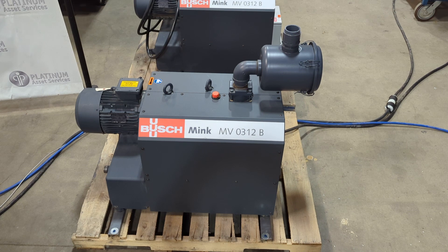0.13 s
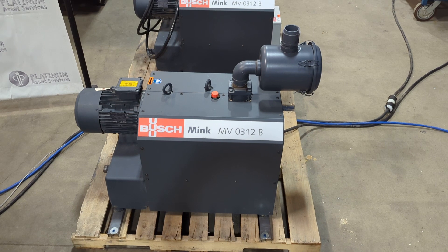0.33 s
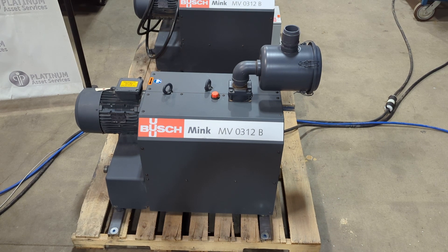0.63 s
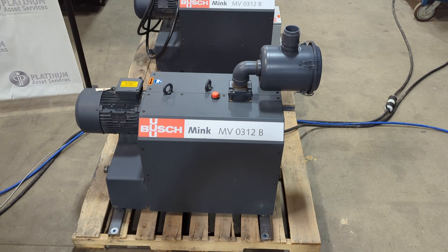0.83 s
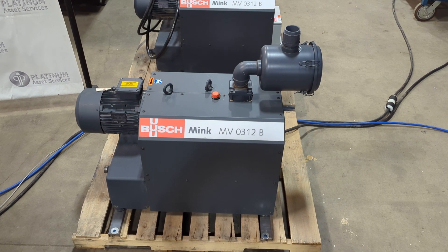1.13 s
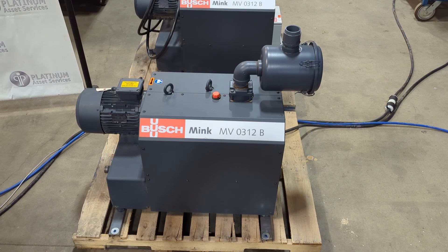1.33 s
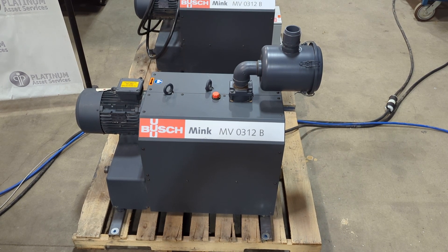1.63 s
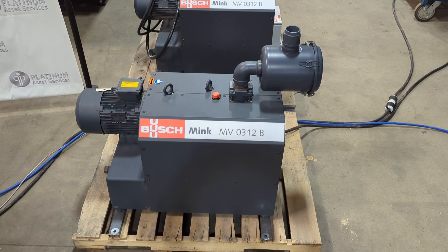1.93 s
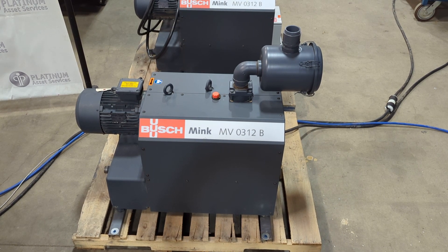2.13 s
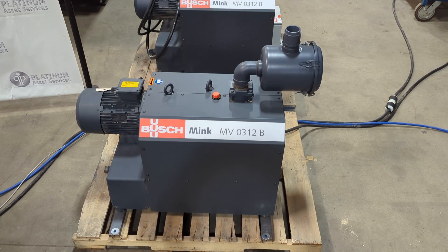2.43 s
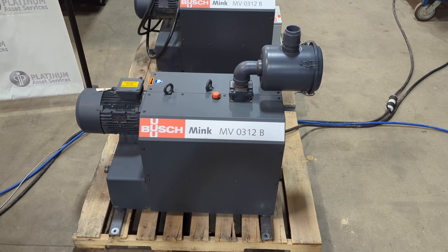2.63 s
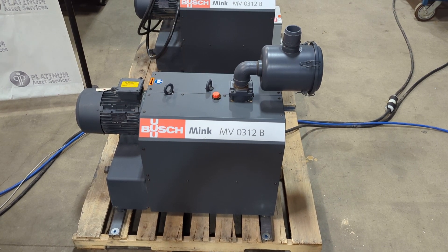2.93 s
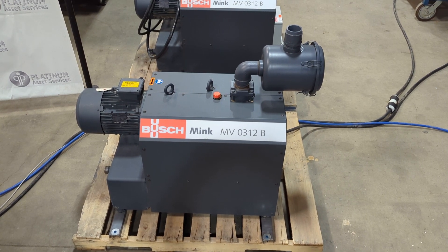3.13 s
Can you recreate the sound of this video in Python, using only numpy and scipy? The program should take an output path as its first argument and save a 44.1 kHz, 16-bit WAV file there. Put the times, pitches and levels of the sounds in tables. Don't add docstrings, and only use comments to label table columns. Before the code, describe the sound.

A vacuum pump hums continuously in a concrete hall, its low buzzing drone layered with higher whirring tones and rushing air, captured close by a stereo phone that ducks the level early on.

```python
import sys
import numpy as np
from scipy import signal
from scipy.fft import rfft, irfft, next_fast_len
from scipy.io import wavfile
from scipy.ndimage import uniform_filter1d

SR = 44100
rng = np.random.default_rng(int(sys.argv[2]) if len(sys.argv) > 2 else 0)


def wrap_up_sound(samples):
    columns = np.atleast_2d(samples).T
    tamed = np.clip(columns, -1, 1)
    steps = np.round(tamed * 32767).astype(np.int16)
    wavfile.write(sys.argv[1], SR, steps)


def level_to_linear(level):
    exponent = np.asarray(level, float) / 20
    return 10 ** exponent


N = 145089
BASS_HZ = 400


def on_log(points, hz):
    p = np.array(points)
    return np.interp(np.log(hz + 1), np.log(p[:, 0]), p[:, 1])


def peak(hz, at_hz, width_hz):
    return 1 / (1 + (2 * (hz - at_hz) / width_hz) ** 2)


def walk(rate_hz):
    hold = int(SR / rate_hz)
    steps = np.repeat(rng.standard_normal(400), hold)[:N]
    drift = uniform_filter1d(uniform_filter1d(steps, hold), hold)
    return (drift - drift.mean()) / drift.std()


def surrounding_likeness(hz):
    port_likeness, ports_m, sound_m_per_s = 1, .145, 343
    return port_likeness * np.sinc(2 * hz * ports_m / sound_m_per_s)


def hall_ripple(hz):
    t60_s, ripple_db = .35, 2
    size = 2 * (len(hz) - 1) if SR / 2 - hz[-1] < 1e-6 else 2 * len(hz) - 1
    echoes = rng.standard_normal((2, size)) * level_to_linear(-60 * np.arange(size) / SR / t60_s)
    one, other = rfft(echoes).real / np.sqrt(np.sum(echoes ** 2) / 4)
    around = surrounding_likeness(hz)
    right = around * one + np.sqrt(1 - around ** 2) * other
    return ripple_db * np.clip(hz / BASS_HZ / 2, 0, 1) * np.array([one, right])


def air_colour(hz):
    # f/Hz, level/dB per Hz
    rush = [(30.0, -41), (55.0, -1), (250.0, -3.5), (550.0, -4.5), (900.0, 0.0), (2300.0, 0),
            (4000.0, -10.5), (15500.0, -19)]
    # f/Hz, difference/dB
    port_balance = [(400.0, 0.5), (900.0, 0.5), (1600.0, 4.8), (2400.0, -0.5), (3500.0, 5.4),
                    (4500.0, -1.0), (13000.0, 0.9), (15500.0, 3.7)]
    # f/Hz, width/Hz, left/dB, right/dB
    resonances = [(192.0, 13.0, 6.9, 6.6), (228.0, 18.0, 5.2, 5.0), (299.0, 8.0, 10.5, 9.3),
                  (388.0, 12.0, -4.9, -3.7), (690.0, 10.0, 4.1, 2.7), (970.0, 80.0, 3.4, 2.3),
                  (1340.0, 730.0, 1.3, 7.8), (1740.0, 310.0, 0.2, 3.9), (2230.0, 100.0, 4.3, -2.8),
                  (2620.0, 320.0, 10.4, 1.9), (2780.0, 60.0, 3.2, 5.9), (2900.0, 90.0, -7.4, -4.7),
                  (3130.0, 170.0, 7.6, 0.6), (3680.0, 80.0, 3.7, 0.6),
                  (4100.0, 70.0, -4.0, -7.3), (4210.0, 80.0, 2.4, 7.2), (5230.0, 450.0, 1.0, 3.3),
             (6200.0, 580.0, 5.7, 0.3), (6890.0, 340.0, 6.8, 2.5), (7550.0, 180.0, -3.3, -3.7),
             (8040.0, 780.0, 5.0, 5.8), (8590.0, 230.0, 0.8, 3.5), (9320.0, 530.0, 2.6, 2.7),
             (9770.0, 460.0, -4.1, -1.1), (10570.0, 570.0, 0.4, 5.0), (11690.0, 790.0, 4.1, 5.1),
             (13200.0, 570.0, 5.5, 8.0), (14110.0, 1170.0, 3.7, 4.4)]
    # f/Hz, width/Hz, left/dB, right/dB
    whistles = [
        (13170, 130, 1.5, 5),
        (10590, 90, 0, 4),
        (11780, 90, 0, 4),
        (3020, 60, 0, 4),
    ]
    db = on_log(rush, hz) + np.array([[.5], [-.5]]) * on_log(port_balance, hz)
    for at_hz, width_hz, *lift_db in resonances + whistles:
        db = db + np.array(lift_db)[:, None] * peak(hz, at_hz, width_hz)
    return db


def likeness(hz):
    paths = [(0.082, 0.17), (0.063, 0.18), (-0.123, -0.1), (-0.103, -0.08), (0.115, 0.11), (0.17, 0.09),
             (0.019, 0.11), (0.19, 0.09), (0.24, -0.1), (-0.14, -0.07), (-0.066, -0.06), (0.409, 0.05)]
    # f/Hz, width/Hz, change of
    panels = [(300, 90, -.3), (1380, 200, -.25), (1850, 250, -.3), (2130, 150, .3), (2650, 400, -.28),
              (3550, 300, .2), (4300, 200, -.25), (5700, 250, .25), (8000, 300, .3)]
    around = surrounding_likeness(hz)
    direct = sum(share * np.exp(-2j * np.pi * hz * far_m / 343) for far_m, share in paths)
    shaken = sum(change * peak(hz, at_hz, width_hz) for at_hz, width_hz, change in panels)
    return around + (1 - abs(around)) * direct + shaken


def inlet_gulps():
    # t/s, lift/dB
    gulps = [
        (.9, 1.5),
        (1.16, 1),
        (1.37, 2.5),
        (1.72, -0.5),
        (2.41, 3),
        (2.5, 0.5),
        (2.7, 2.5),
        (2.77, 2),
        (2.9, 3.5),
        (3.12, 2),
    ]
    gulp_s = .018
    t = np.arange(N) / SR
    return sum(lift_db * np.exp(-((t - at_s) / gulp_s) ** 2) for at_s, lift_db in gulps)


def air():
    rush_db = -16
    surge_db, surge_hz, flicker_db, flicker_hz = .5, 14, 0.15, 18
    rattle_db, rattle_at_hz = 0.52, 2600
    treble_creep_db_per_s = 0.5
    size = next_fast_len(N)
    hz = np.arange(size // 2 + 1) * SR / size
    db = air_colour(hz) + hall_ripple(hz)
    like = likeness(hz)
    left, own = rfft(rng.standard_normal((2, size)))
    right = like * left + np.sqrt(np.clip(1 - abs(like) ** 2, 0, 1)) * own
    both = level_to_linear(db) * np.array([left, right])
    surge, gulps = surge_db * walk(surge_hz), inlet_gulps()
    from_middle_s = (np.arange(N) - N / 2) / SR
    octave = np.log2(hz / 40 + 1e-9)
    out = 0
    for centre in np.arange(19) / 2:
        band = np.cos(np.pi * np.clip(octave - centre, -.5, .5)) ** 2
        rattle = rattle_db * np.exp(-(centre - np.log2(rattle_at_hz / 40)) ** 2)
        flicker = (flicker_db + rattle) * walk(flicker_hz)
        swing = surge + gulps * np.clip(centre - 3.5, 0, 1) + flicker
        creep = treble_creep_db_per_s * from_middle_s * np.clip(centre - 6.5, 0, 1)
        out = out + level_to_linear(swing + creep) * irfft(both * band, size)[:, :N]
    return out * level_to_linear(rush_db) / out.std()


def claws():
    # multiple of the pulse rate, left/dB, right/dB, lag of the right port/radians
    pulse_orders = [(1, -19, -19, -0.0), (4, -44, -44, -0.3), (6, -40, -40, 0.6), (7, -27, -25, -0.2),
                    (8, -30, -24, -1.4), (9, -31, -30, -0.1), (10, -33, -29, -0.9), (12, -32, -36, -2.4),
                    (13, -31, -25, -1.5), (14, -30, -26, -2.2), (15, -42, -35, 2.1), (16, -30, -34, 3.0),
                    (16.5, -40, -41, 1.2), (19, -38, -41, -1.4), (22, -40, -42, -2.9), (23, -38, -37, -2.4),
                    (25, -48, -49, -2.7), (27, -42, -44, 0.6), (28, -50, -49, -2.0), (36, -52, -51, 1.9),
                    (41, -50, -55, -2.0), (42, -51, -51, -2.3), (44, -47, -55, -0.7), (46, -51, -56, 1.3),
                    (54, -47, -57, -1.6), (112, -53, -50, 0.7)]
    pulse_hz, speed_wander = 117.372, 0.00016
    drone_wobble_db, order_wobble_db, wobble_hz = 1, 1.5, 8.97
    drone_sway = 0.047
    order_spread = 2.807
    turn = 2 * np.pi * np.cumsum(pulse_hz * (1 + speed_wander * walk(1.99))) / SR
    sway = drone_sway * (1 + walk(5.9))
    out = np.zeros((2, N))
    for multiple, left_db, right_db, lag in pulse_orders:
        multiple = np.round(2 * multiple) / 2
        phase = multiple * turn + order_spread * multiple ** 2
        wobble_db = drone_wobble_db if multiple == 1 else order_wobble_db
        wobble = level_to_linear(wobble_db * walk(wobble_hz))
        left = level_to_linear(left_db) * np.sin(phase)
        right = level_to_linear(right_db) * np.sin(phase - lag - sway)
        out += np.sqrt(2) * wobble * np.array([left, right])
    return out


def scene():
    return air() + claws()


def roll_off(x):
    return signal.sosfilt(signal.butter(12, 16860, fs=SR, output="sos"), x)


def record(dry):
    # t/s, gain/dB
    gain = [
        (.06, 1.5),
        (.13, 1.5),
        (.21, 1),
        (.39, -2.5),
        (.9, -1),
        (1.5, 0),
        (2.2, 1),
        (2.8, 1.5),
        (3.29, 1.5),
    ]
    opens_s, mid_hz, ceiling, top_hz = .0612, 1800, 1.87, 15700
    t = np.arange(N) / SR

    def below(hz):
        return signal.sosfiltfilt(signal.butter(2, hz, fs=SR, output="sos"), dry)

    def fade(rise_s):
        return 1 - np.exp(-np.clip(t - opens_s, 0, None) / rise_s)

    bass, lows = below(BASS_HZ), below(mid_hz)
    x = bass * fade(0.021) + (lows - bass) * fade(.01) + (dry - lows) * fade(0.0025)
    x = x * level_to_linear(np.interp(t, *np.array(gain).T))
    x = ceiling * np.tanh(x / ceiling)
    treble_cut = signal.ellip(16, .2, 80, top_hz, fs=SR, output="sos")
    return roll_off(signal.sosfilt(treble_cut, x))


dry = scene()
out = record(dry)
wrap_up_sound(out)
```